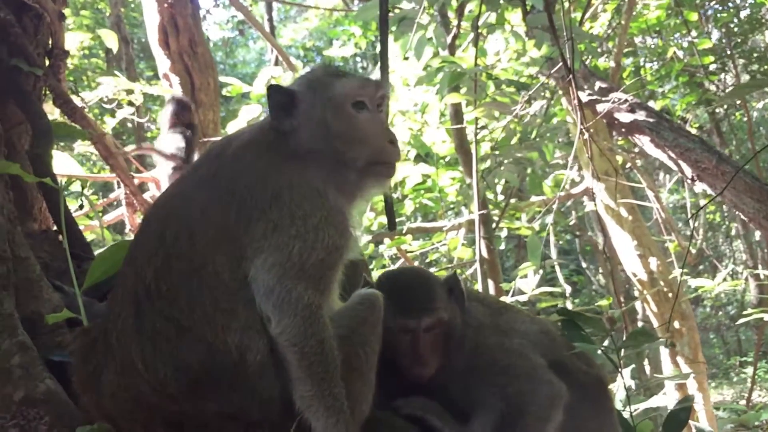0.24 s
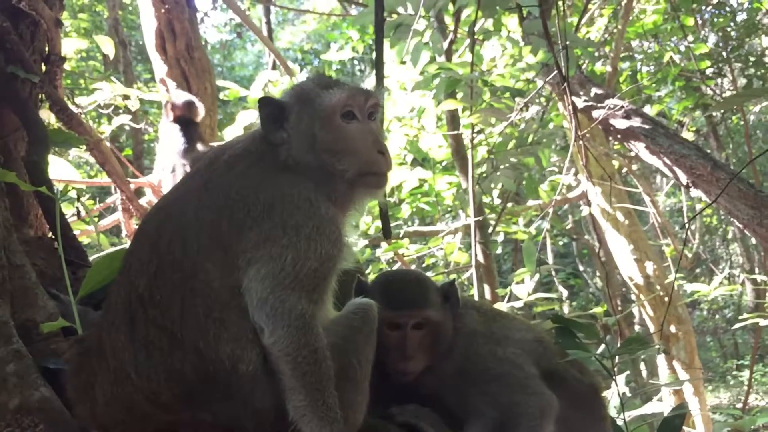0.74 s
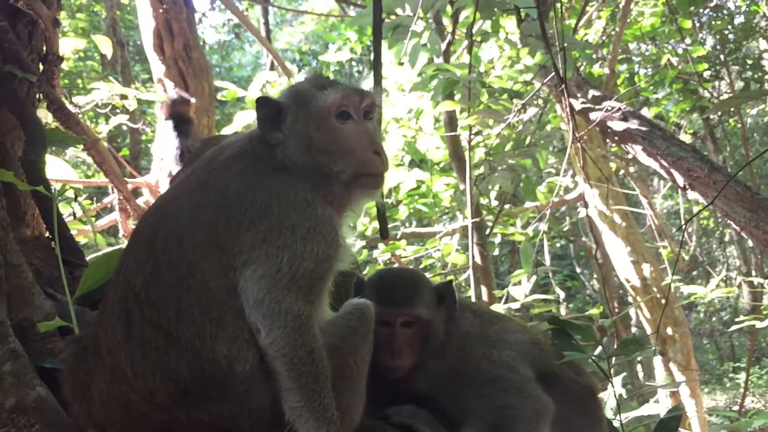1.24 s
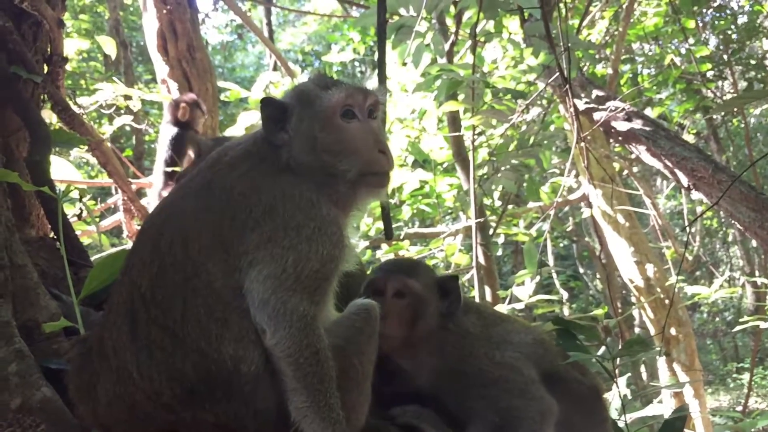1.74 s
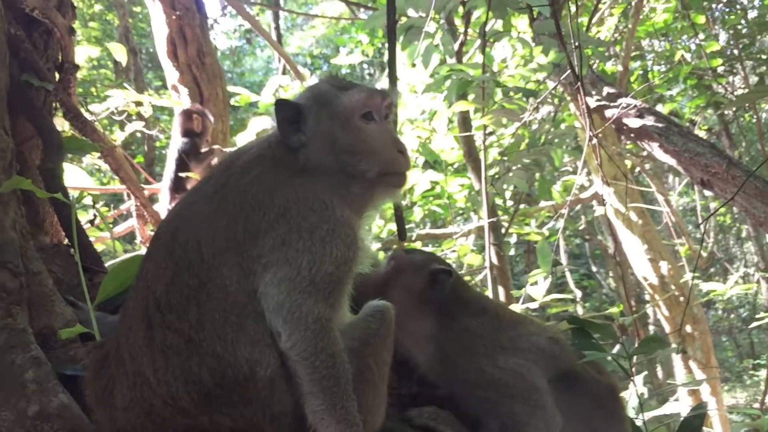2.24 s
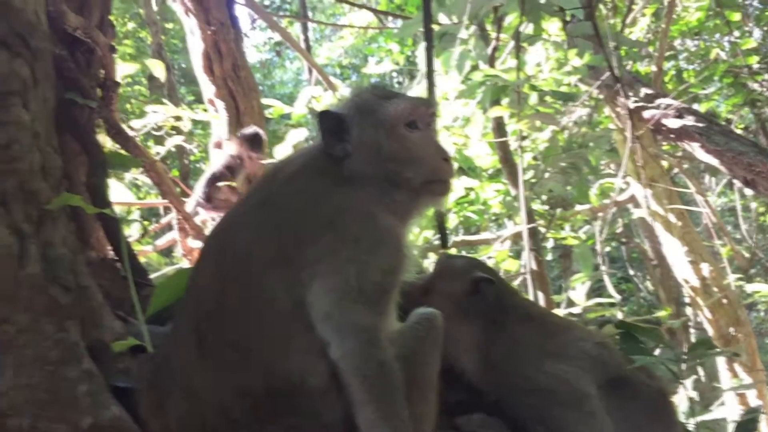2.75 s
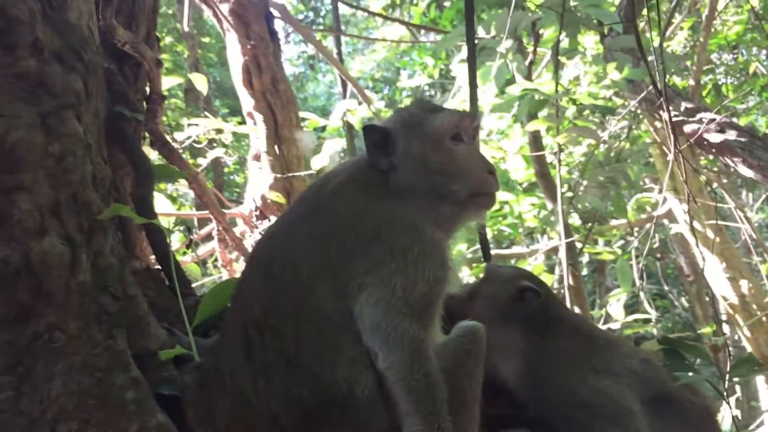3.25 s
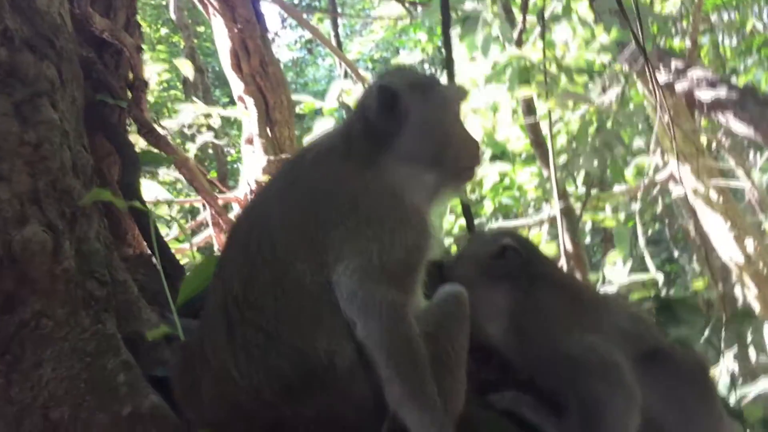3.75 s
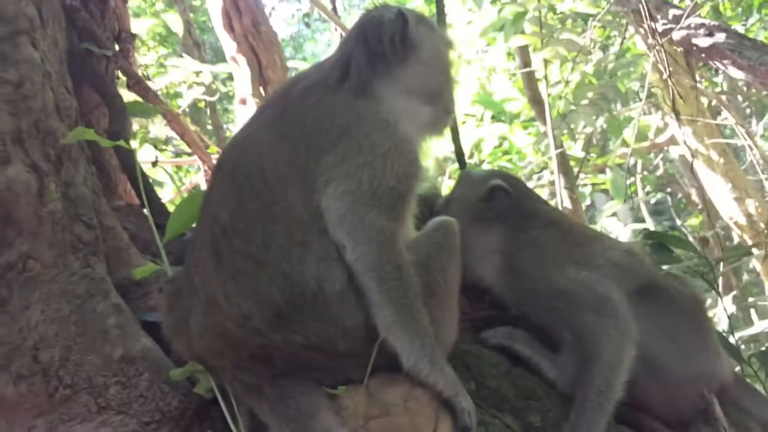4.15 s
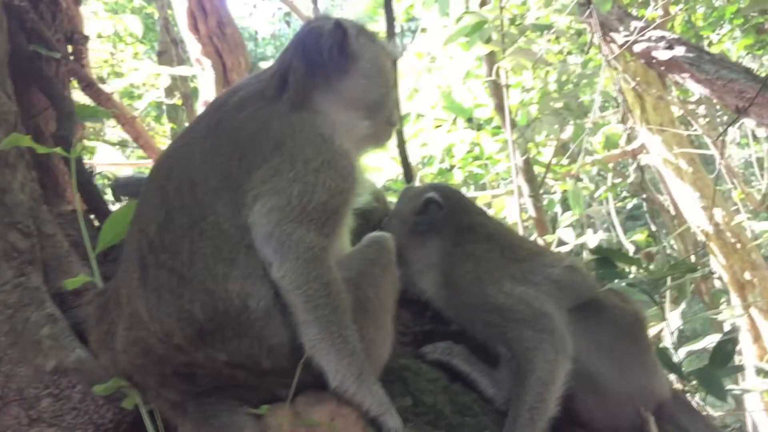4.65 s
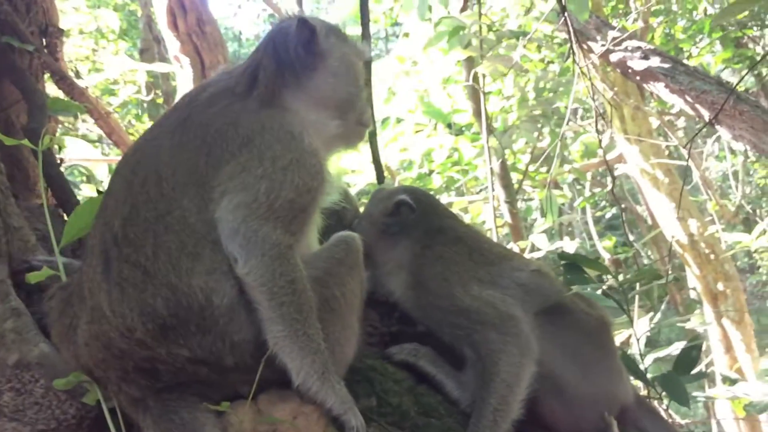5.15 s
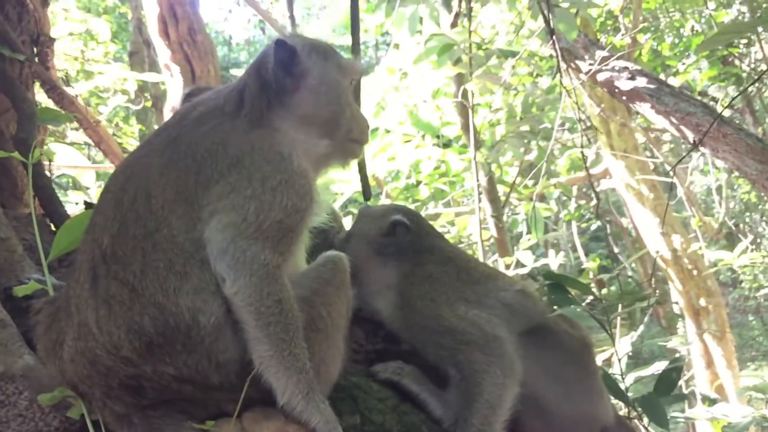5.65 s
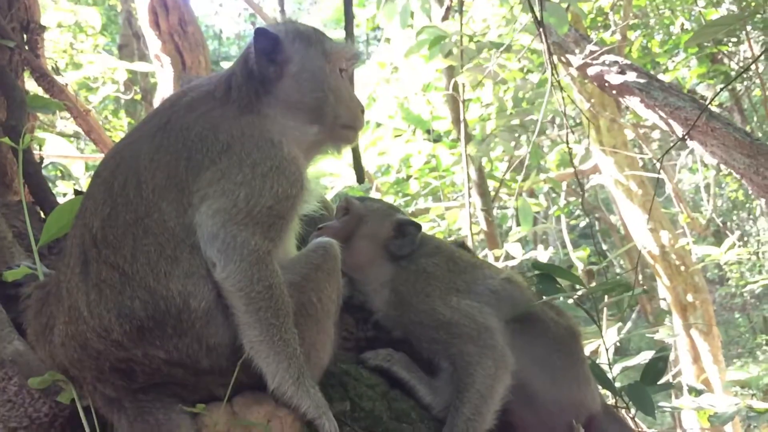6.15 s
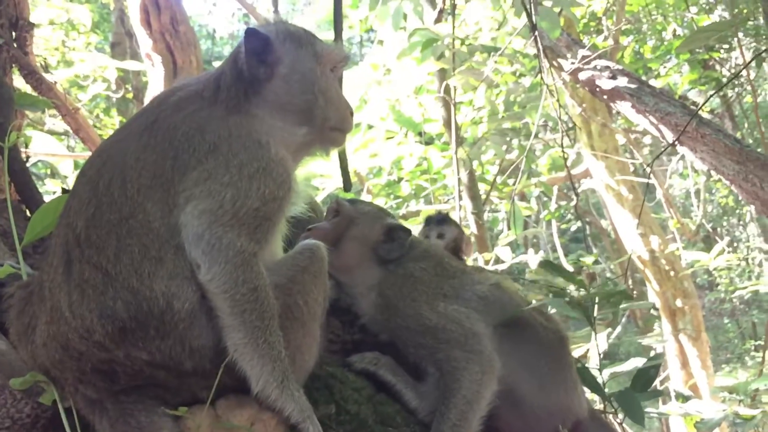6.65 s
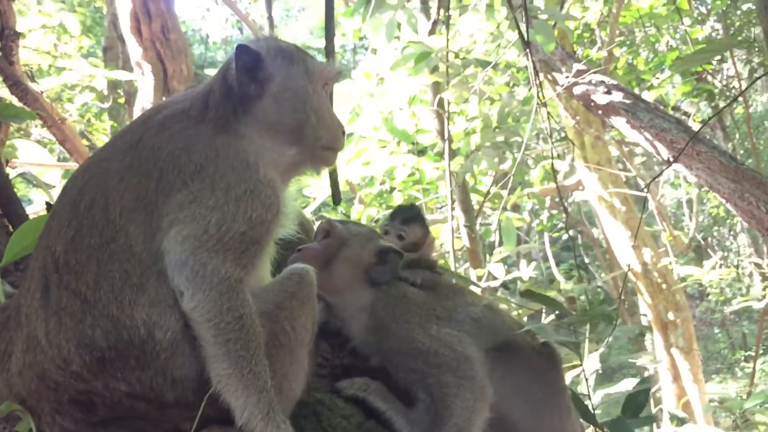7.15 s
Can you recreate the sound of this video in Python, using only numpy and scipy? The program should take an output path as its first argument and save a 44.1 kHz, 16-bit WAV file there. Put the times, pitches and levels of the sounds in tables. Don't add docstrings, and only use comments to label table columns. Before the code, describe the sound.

Throughout, crickets chirp in fast, falling high-pitched strokes, the nearest about six times a second, with a slower, lower neighbour and a shimmering distant chorus. Beneath lie a soft deep rumble that swells slightly and a faint steady leaf hiss. From 0.1 to 0.8 seconds small twigs tick and leaves brush, most strongly around 0.6. Near 1.97 a thicker branch breaks with a short, ringing woody crack. Around 3.2 come sharp snaps and bark scrapes, and a far bird gives a thin falling whistle and quick trill. Rustles and scratches gather at 3.5 to 3.8, ending with a dull knock at 3.77. Light ticks follow near 4.2 and 4.5. The bird trills again at 5.0. Calmer insects continue, then small snaps and rustle at 6.4 to 6.6, and scraping with a last trill around 7.05. The forest scatters soft echoes.

```python
import sys
import numpy as np
from scipy import signal
from scipy.fft import rfft, irfft
from scipy.io import wavfile
from scipy.ndimage import uniform_filter1d

SR = 44100
rng = np.random.default_rng(int(sys.argv[2]) if len(sys.argv) > 2 else 0)


def wrap_up_sound(samples):
    columns = np.atleast_2d(samples).T
    tamed = np.clip(columns, -1, 1)
    steps = np.round(tamed * 32767).astype(np.int16)
    wavfile.write(sys.argv[1], SR, steps)


def boost(x):
    u = np.asarray(x, float) / 20
    return 10 ** u


N = 325899

# start in seconds,
# peak in dB, start in seconds, peak in dB.
LEADER_CHIRPS = [(0.1257, -53.5, 0.3017, -54), (0.4703, -53.5, 0.657, -52), (0.8143, -53, 0.995, -50),
                 (1.1521, -53, 1.3134, -52.5), (1.4827, -53, 1.6423, -51.5), (1.826, -52.5, 1.991, -53.5),
                 (2.1707, -54, 2.3275, -52), (2.4789, -53, 2.6445, -51.5), (2.804, -51.5, 2.9742, -55),
                 (3.1418, -53, 3.3137, -54.5), (3.4796, -51.5, 3.6578, -51), (3.8353, -50.5, 3.9795, -51.5),
                 (4.1409, -53, 4.297, -51), (4.4792, -49, 4.64, -48), (4.8234, -51.5, 5.0207, -51),
                 (5.191, -52, 5.3404, -49.5), (5.529, -50, 5.713, -51), (5.8706, -51, 6.0413, -49.5),
                 (6.1985, -50.5, 6.3818, -50), (6.566, -52, 6.7234, -51), (6.8872, -49.5, 7.043, -51),
                 (7.2129, -52, 7.37, -51)]
# start in seconds, peak in dB.
NEIGHBOUR_CHIRPS = [(0.2478, -51.5), (0.494, -54.5), (0.723, -55), (1.2507, -58), (1.4761, -56.5),
                    (1.7023, -55), (1.947, -57), (2.1963, -58), (2.4326, -52.5), (2.6705, -62),
                    (2.913, -56.5), (3.152, -55), (3.4002, -58), (3.6308, -69), (3.8588, -52.5),
                    (4.099, -57), (4.3178, -52), (4.577, -65), (4.838, -50.5), (5.063, -60), (5.3193, -53),
                    (5.5633, -55), (5.8216, -52.5), (6.0582, -55), (6.303, -64), (6.59, -59),
                    (6.836, -53.5), (7.061, -60), (7.3263, -58)]
# start in seconds, peak in dB,
# pitch in Hz.
OTHER_CHIRPS = [(0.774, -61, 5070), (1.1767, -59, 5030), (1.9053, -59, 4980), (2.0438, -55, 4550),
                (2.625, -53, 4950), (2.8502, -53.5, 4700), (3.0396, -51.5, 5060), (3.2071, -51, 5020),
                (3.367, -50, 5000), (3.678, -53, 4940), (3.7058, -58, 5050), (3.844, -54, 5230),
                (3.9917, -56, 5130), (4.1485, -55, 4720), (4.1626, -49.5, 4630), (4.4702, -49.5, 4950),
                (4.646, -51, 5110), (4.818, -54, 5400), (5.031, -59, 5070), (6.397, -56, 4620),
                (6.9184, -53, 5000), (7.108, -56, 4770), (7.1507, -59.7, 4730), (7.287, -59, 4940),
                (.0391, -59, 4850), (.0739, -61, 4650), (.11, -65, 4800), (.14, -71, 4860),
                (.3802, -68, 5050), (.3915, -65, 4830), (.7614, -58, 4800), (.8763, -62, 4650),
                (1.0653, -56, 4650), (1.0824, -62, 4680), (1.2322, -57, 4750), (1.8791, -61, 4700),
                (2.0886, -57, 4950), (2.24, -60, 4600), (2.2673, -58, 4670), (2.2801, -59, 4780),
                (2.292, -60, 4750), (2.3056, -64, 4670), (2.4457, -54, 4900), (2.4573, -55, 4670),
                (2.5005, -60, 4650), (2.5122, -64, 4800), (2.7194, -62, 4960), (3.1188, -63, 4680),
                (3.4539, -59, 4720), (3.666, -57, 4650), (4.3471, -63, 4630), (4.6104, -69, 4650),
                (4.7215, -58, 4650), (4.8991, -58, 4700), (5.9581, -59, 4600), (6.1673, -59, 4760),
                (6.7389, -65, 4960)]
# start in seconds, peak in dB, pitch in Hz.
LOW_PIPS = [(0.1945, -53, 4130), (0.4833, -54, 4150), (0.7672, -49, 4190), (1.058, -53, 4160),
            (1.3493, -53.5, 4140), (1.623, -50.5, 4100), (1.9444, -52, 4130), (2.199, -51, 4090),
            (2.638, -52, 4120), (6.3435, -56, 4230), (6.6578, -53.5, 4200), (7.343, -54, 4160)]
# time in seconds, level in dB.
CHORUS_LEVEL = [(0.0, -66.5), (0.56, -72.5), (1.56, -67.5), (2.06, -67.5), (2.45, -73), (3.31, -65.5),
                (3.48, -71.5), (4.69, -67), (5.54, -73.5), (5.95, -69), (6.32, -69.5), (7.39, -65.5)]
# time in seconds, level in dB.
STIRRING = [(0.0, -77), (0.095, -80), (0.12, -68.5), (0.5, -70), (0.8, -67.5), (1.0, -74), (1.75, -75.5),
            (2.06, -71), (2.4, -77), (3.1, -79), (4.0, -82), (4.6, -77), (5.0, -78.5), (6.45, -81),
            (7.0, -78.5), (7.39, -81)]
# start in seconds, hold in seconds, level in dB, then the dull part
# and the papery part in dB against the middle.
BRUSHES = [(0.152, .02, -75, 5.5, -4), (0.318, 0.029, -66.5, -2.5, 4), (0.51, 0.021, -65.5, -3, 0.5),
           (0.563, 0.01, -54.5, 1, 2), (0.582, 0.021, -55, 0, 1), (0.617, 0.023, -60.5, 2, 3),
           (0.66, 0.041, -65, 2.5, 2), (0.711, 0.038, -62, 1, 1), (0.796, 0.027, -72, 1.5, -12),
           (1.85, 0.022, -70.5, -3, .4), (1.974, .02, -65.5, 3.3, 2.5), (2.528, 0.028, -72.5, 2.5, 0),
           (3.016, 0.024, -71, 1, 0.5), (3.179, 0.031, -69, 3.5, 2), (3.494, 0.022, -73, 2, -.3),
           (3.582, 0.025, -75, 5.5, 2), (3.628, 0.1, -65, -4, 2), (3.67, 0.008, -71, -10.5, 4),
           (3.686, 0.012, -68, 8, -2), (3.708, 0.012, -66, -11, 3), (3.727, 0.015, -65.5, 2, -1),
           (3.955, 0.029, -68.5, -2, 3.5), (4.194, .015, -75, -2, -.6), (4.36, 0.0097, -72.5, 0, -3),
           (4.673, 0.05, -71, 0, -1), (4.822, 0.018, -73, -4, -2), (5.15, .012, -80.5, -1, 5),
           (5.283, .012, -83, 5, 1), (6.548, 0.022, -68, -2.5, -2.5), (6.595, 0.0053, -70, 0.5, -1),
           (7.05, 0.049, -69, 2, 3)]
# frequency in Hz, density in dB per Hz.
RUSTLE_COLOUR = [(400, -11), (800, -11.5), (1300, -6.5), (2500, 0.5), (6000, 0.5), (9000, -5), (12000, -13),
                 (15800, -17)]
# start in seconds, peak in dB, wood ring in Hz, ring against crack in dB,
# crackle t60 in seconds.
TWIG_SNAPS = [(0.1092, -60, 2280, -9, 0.05), (0.3056, -50, 1020, -23, 0.044),
              (0.3242, -50, 4050, -2.5, 0.055), (0.508, -58, 3660, 1.5, 0.046),
              (0.5651, -51.5, 3970, 6, 0.059), (1.441, -60, 1990, -13, 0.061),
              (1.9706, -43, 1404, 8.5, 0.043), (3.13, -51.5, 1500, -18, 0.032),
              (3.1707, -54, 4040, -7, 0.061), (3.1864, -41, 4000, -4.5, 0.06),
              (3.1914, -47, 3200, 0, 0.065), (3.5856, -70, 2640, 9, 0.046), (3.963, -57, 3460, -1.5, 0.064),
              (4.184, -56.5, 3750, 8.5, 0.038), (4.3583, -60.5, 2360, 0.5, 0.045),
              (4.563, -69.5, 1260, 7, 0.059), (5.2784, -60, 1010, -11, 0.05),
              (5.8536, -60, 1384, -10, 0.043), (6.3965, -78, 2900, -7, 0.04), (6.562, -52, 3990, -9, 0.056),
              (7.271, -58.5, 3970, 0.5, 0.058)]
# start in seconds, peak in dB, pitch in Hz, t60 in seconds.
KNOCKS = [
    (3.147, -71, 397, 0.096),
    (3.493, -65, 444, 0.02),
    (3.7697, -50, 557, 0.023),
    (4.454, -66, 317, 0.024),
]
# start in seconds, peak in dB, pitch in Hz, length in seconds.
BARK_SCRAPES = [(0.202, -72, 2400, .03), (0.73, -63, 1000, .015), (3.145, -70, 480, .015),
                (3.18, -62, 1650, .016), (3.18, -63, 1360, .016), (3.181, -66, 730, .015),
                (3.215, -68, 1720, .02), (3.184, -58, 3050, .016), (3.495, -67, 750, .015),
                (3.503, -66, 3350, .018), (3.587, -61, 2730, .01), (3.673, -62, 2900, .012),
                (3.694, -62, 3300, .008), (3.693, -63, 1600, .015), (3.723, -62, 8400, .007),
                (3.728, -62, 3900, .008), (3.755, -67, 560, .014), (4.184, -58, 3900, .008),
                (6.397, -56, 2980, .0035), (6.409, -63, 3050, .004), (6.546, -66, 2870, .009),
                (7.047, -65, 2330, .018), (7.053, -65, 2070, .02), (7.068, -64, 2350, .016),
                (7.09, -67, 1930, .016), (7.264, -66, 1400, .012), (7.04, -67, 4270, .08),
                (7.066, -65, 2700, .016), (7.069, -63, 3400, .016), (7.091, -67, 3000, .014),
                (7.265, -65, 3990, .013)]
# frequency in Hz, level in dB, t60 in seconds.
BRANCH_MODES = [(1205, 1, .05), (2110, -5, 0.065), (2846, 0, 0.046), (3200, -9, 0.059), (4470, -15, 0.035),
                (5250, -4, .04), (6040, -8, .045), (6700, -10, .04)]
# start in seconds, level in dB.
BIRD_CALLS = [
    (3.257, -65),
    (5.025, -65),
    (7.037, -64),
]
# time in seconds, level in dB.
RUMBLE_LEVEL = [(0, -49.5), (1.0, -49), (1.9, -51.5), (2.8, -48.5), (4.4, -50), (5.3, -48.5), (6.3, -49.5),
                (7.39, -48.5)]
# frequency in Hz, density in dB per Hz.
RUMBLE_COLOUR = [(13, -52), (27, -36.5), (39, -10.5), (55, -1.5), (80, -1.5), (120, -5), (160, -11.5),
                 (210, -22.5), (330, -30), (430, -54)]
# frequency in Hz, density in dB per Hz.
HISS_COLOUR = [(200, -7.5), (330, -1.5), (600, -4.5), (1200, -7.5), (2500, -13), (4000, -14), (6000, -19.5),
               (7700, -23.5), (8600, -15.5), (10500, -27), (12000, -22.5), (15500, -31)]


def crickets():
    strokes, low = np.zeros(N), np.zeros(N)
    rows = chirps()
    for (s, db, hz), (u, v) in zip(rows, rng.random((len(rows), 2))):
        high = np.clip((hz - 4880) / 100, 0, 1)
        fall_hz_s = 65000 + 45000 * high + 25000 * u
        main = stroke(hz + 60, fall_hz_s, .0026, .003 + .0015 * v)
        add(strokes, s - 530 / SR, boost(db + 2.5) * main)
        lead_in = stroke(5150, 170000, .0008, .0035)
        add(strokes, s - .0128 - 530 / SR, high * boost(db - 2.5 * v) * lead_in)
    for s, db, hz in LOW_PIPS:
        add(low, s + .003 - 500 / SR, boost(db - 1.5) * stroke(hz, 25000, .0025, .003))
        add(low, s - .009 - 500 / SR, boost(db - 10) * stroke(hz + 60, 25000, .0018, .0061))
    near = wing(strokes)
    return near + low + boost(-3.5) * forest(near + .6 * low, .22, .007)


def chirps():
    lead = np.reshape(LEADER_CHIRPS, (-1, 2))
    rows = [(s, db, 5110 + 157 * v) for (s, db), v in zip(lead, rng.uniform(-1.2, 1, len(lead)))]
    gap_s = .014
    chances = rng.standard_normal((len(NEIGHBOUR_CHIRPS), 2))
    for (s, db), (u, v) in zip(NEIGHBOUR_CHIRPS, chances):
        hz = 4650 + 46 * u
        rows.append((s, db + 1, hz))
        rows.append((s - gap_s, db - 6 + v, hz - 40))
        rows.append((s + gap_s * (1 + .2 * v), db - 9, hz))
    return rows + OTHER_CHIRPS


def stroke(hz, fall_hz_s, rise_s, die_s):
    t = np.arange(-500, 500) / SR
    swell = np.where(t < 0, np.exp(-(t / rise_s) ** 2), np.exp(-np.abs(t) / die_s))
    return swell * np.sin(2 * np.pi * (hz * t - fall_hz_s * t ** 2 / 2) + rng.uniform(0, 7.26))


def wing(x):
    return signal.sosfilt(signal.butter(4, [4420, 5650], "band", fs=SR, output="sos"), x)


def chorus():
    strokes = np.zeros(N)
    for u, v, w in rng.random((2000, 3)):
        far_stroke = stroke(4600 + 680 * w ** 1.5, 25000 + 60000 * w, .003, .004)
        add(strokes, u * N / SR, boost(6 * v) * far_stroke)
    level = boost(in_time(CHORUS_LEVEL)[0] - 2.5 + 5.5 * joining(chirps()))
    return level * rms_one(wing(strokes + boost(4) * forest(strokes, .065, .0019)))


def joining(rows):
    rise_s, die_s = .014, .018
    t = np.arange(0, N / SR, .002)
    since = t - np.array(rows)[:, :1]
    swell = np.where(since < 0, np.exp(since / rise_s), np.exp(-since / die_s)).max(axis=0)
    return np.interp(np.arange(N) / SR, t, swell)


def rustle():
    mid_gain, dull_gain, top_gain = leaf_levels()
    grains = coloured(leaf_grains(), RUSTLE_COLOUR)
    soft = coloured(rng.standard_normal(N), RUSTLE_COLOUR)
    dull = dull_gain * boost(5.5 + .82 * drift(23)) * rms_one(band(.72 * grains + soft, 300, 3740))
    mid = mid_gain * boost(7.5 + 1.3 * drift(22)) * rms_one(band(.22 * grains + soft, 2850, 8700))
    papery = top_gain * boost(9 + drift(38)) * rms_one(band(.44 * grains + soft, 7060, 16300))
    return dull + mid + papery


def leaf_grains():
    happens = rng.random(N) < 6000 * boost(2 * drift(40)) / SR
    size = boost(2.8 * np.minimum(rng.exponential(1, N), 5))
    pops = happens * size * rng.choice([-1, 1], N)
    patch, out = rng.integers(0, 20, N), 0
    for k, hz in enumerate(np.geomspace(600, 15000, 20)):
        r = boost(-60 * hz ** .5 / (.45 * SR))
        resonance = [1, -2 * r * np.cos(2 * np.pi * hz / SR), r * r]
        ring = signal.lfilter([1], resonance, pops * (patch == k) + 1e-18)
        out = out + np.sqrt(hz) * rms_one(ring)
    return rms_one(out)


def leaf_levels():
    rise_db_s, fall_db_s = 1300, 339
    t = np.arange(0, N / SR, .002)
    s, hold, db, dull_db, top_db = np.transpose(BRUSHES)[:, :, None]
    rise = rise_db_s * np.maximum(s - t, 0)
    fall = fall_db_s * np.maximum(t - s - hold, 0)
    brush = boost(db - rise - fall)
    stir = boost(in_time(STIRRING)[0])

    def together(gains):
        return np.sqrt(np.interp(np.arange(N) / SR, t, (gains ** 2).sum(axis=0)))

    mid = np.hypot(stir, together(brush))
    dull = np.hypot(stir * boost(1.5), together(brush * boost(dull_db)))
    papery = boost(-6.5) * np.hypot(stir, together(brush * boost(top_db)))
    return mid, dull, papery


def twigs():
    out, t = np.zeros(N), np.arange(round(.12 * SR)) / SR
    second_fibre = .6 * (t > .0045) * boost(-60 * (t - .0045) / .012)
    cracks = boost(-60 * t / .006) + second_fibre
    for s, db, hz, ring_db, t60 in TWIG_SNAPS:
        crackle = rng.standard_normal(len(t)) * (cracks + 1.24 * boost(-60 * t / max(t60, .005)))
        wood = np.sin(2 * np.pi * hz * t) * boost(-60 * t * hz / 17) * (1 - np.exp(-t / .0005))
        crack = boost(db - 8.5) * band(crackle, 2900, 12400)
        ring = boost(db + ring_db) * (3.25 * wood + .7 * band(crackle, 1300, 6000))
        add(out, s + .00075, crack + ring)
    for s, db, hz, t60 in KNOCKS:
        swell = boost(-60 * t / max(t60, .005)) * (1 - np.exp(-t / .0021)) ** 2
        tone = np.sin(2 * np.pi * hz * t) + .25 * np.sin(2 * np.pi * 1.97 * hz * t)
        add(out, s, boost(db + 23) * swell * tone)
        add(out, s, boost(db + 11) * band(rng.standard_normal(len(t)) * cracks, 440, 2100))
    for s, db, hz, length in BARK_SCRAPES:
        rub = band(rng.standard_normal(len(t)), .98 * hz, 1.02 * hz)[::-1]
        swell = np.sin(np.pi * np.clip(t / length, 0, 1))
        add(out, s, boost(db) * rms_one(rub * swell) * np.sqrt(length / .2))
    return out + boost(-16) * forest(out, .07, .004)


def branch():
    break_s, break_db = 1.9716, -47.5
    out, t = np.zeros(N), np.arange(round(.12 * SR)) / SR
    ring = np.zeros(len(t))
    for k, (hz, db, t60) in enumerate(BRANCH_MODES):
        ring += boost(db - 60 * t / max(t60, .01)) * np.sin(2 * np.pi * hz * t + k * k)
    add(out, break_s, boost(break_db) * ring)
    add(out, break_s + .0056, boost(break_db - 3) * ring)
    return out


def bird():
    out = np.zeros(N)
    t, held = np.arange(round(.045 * SR)) / SR, np.arange(round(.1 * SR)) / SR
    whistle = np.sin(np.pi * t / t[-1]) * np.sin(2 * np.pi * (3520 * t - 2300 * t ** 2))
    top_note = np.sin(np.pi * held / held[-1]) * np.sin(2 * np.pi * 3470 * held)
    for s, db in BIRD_CALLS:
        add(out, s, boost(db) * whistle)
        add(out, s + .04, boost(db - 9) * top_note)
        for k in range(7):
            add(out, s + .037 + .01 * k, boost(db - 6 - .9 * k) * stroke(3240, 12000, .006, .005))
    return out + boost(-3) * forest(out, .9, .02)


def background():
    noise = coloured(rng.standard_normal(N), RUMBLE_COLOUR + [(760, -125)])
    steady = noise / np.sqrt(uniform_filter1d(noise ** 2, size=22000))
    rumble = boost(in_time(RUMBLE_LEVEL)[0] + .13 + 1.56 * drift(5.3)) * steady
    hiss = rms_one(coloured(rng.standard_normal(N), HISS_COLOUR)) * boost(-68.5 + 1.46 * drift(1.55))
    return rumble + hiss


def forest(x, t60, gap_s):
    t = np.arange(round(.6 * SR)) / SR
    trunks = 1 + 3.2 * (rng.random(len(t)) < 250 / SR)
    tail = rng.standard_normal(len(t)) * trunks * boost(-60 * t / t60) * (1 - np.exp(-t / gap_s))
    return signal.fftconvolve(x, tail / np.sqrt(np.sum(tail ** 2)))[:N]


def rms_one(x):
    return x / np.sqrt(np.mean(x ** 2) + 1e-20)


def in_time(rows):
    s, *columns = np.transpose(rows)
    return [np.interp(np.arange(N) / SR, s, c) for c in columns]


def drift(rate):
    r = np.exp(-80 * np.pi * rate / SR)
    slow = signal.lfilter([1], [1, -2 * r, r * r], rng.standard_normal(N // 40 + 2002))[2000:]
    return np.interp(np.arange(N) / 40, np.arange(len(slow)), rms_one(slow))


def coloured(x, spectrum):
    hz, db = np.transpose(spectrum)
    grid = np.arange(len(x) // 2 + 1) * SR / len(x) + 1
    return irfft(rfft(x) * boost(np.interp(np.log(grid), np.log(hz), db, left=-70)), len(x))


def band(x, low_hz, high_hz):
    edges = [low_hz, min(high_hz, .45 * SR)]
    return signal.sosfilt(signal.butter(2, edges, "band", fs=SR, output="sos"), x)


def add(out, s, sound):
    i = max(round(s * SR), 0)
    out[i:i + len(sound)] += sound[:max(N - i, 0)]


def scene():
    return (crickets() + chorus() + bird() + rustle() + twigs() + branch() + background())[None]


def top_cut(x):
    return signal.sosfilt(signal.butter(12, 16290, fs=SR, output="sos"), x)


def record(dry):
    faded = dry * signal.windows.tukey(N, .002)
    mix = signal.sosfilt(signal.ellip(10, .5, 50, 15800, fs=SR, output="sos"), faded)
    return top_cut(mix)


dry = scene()
out = record(dry)
wrap_up_sound(out)
```